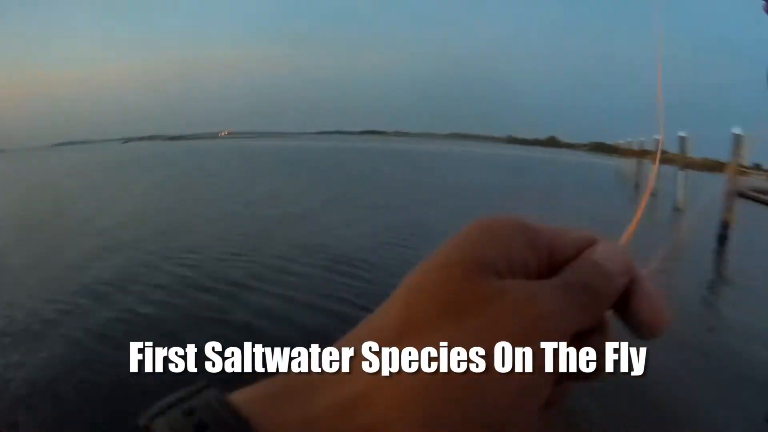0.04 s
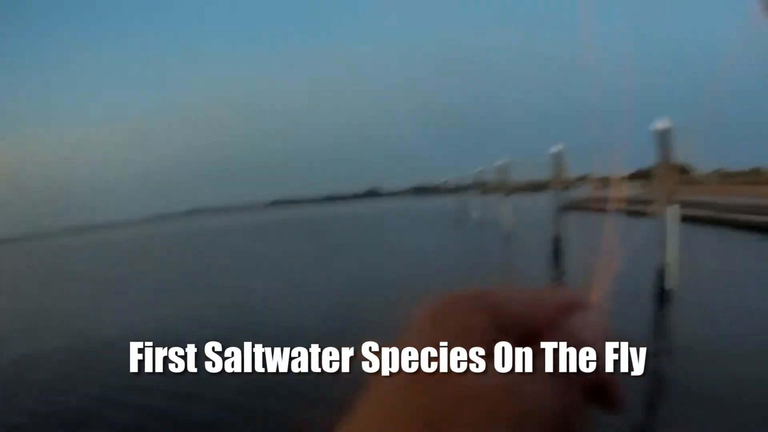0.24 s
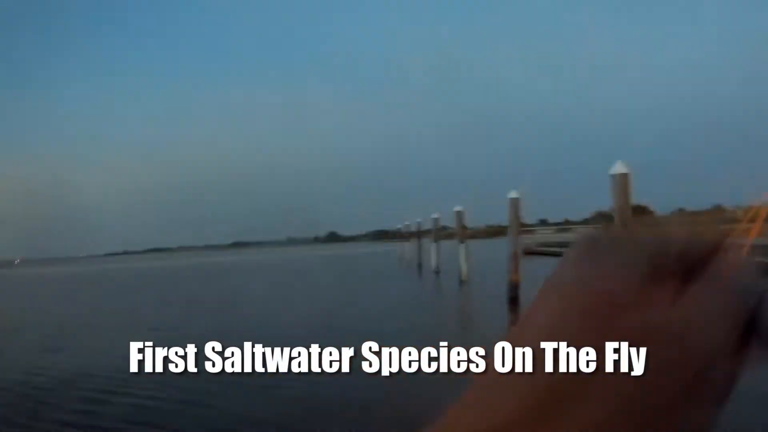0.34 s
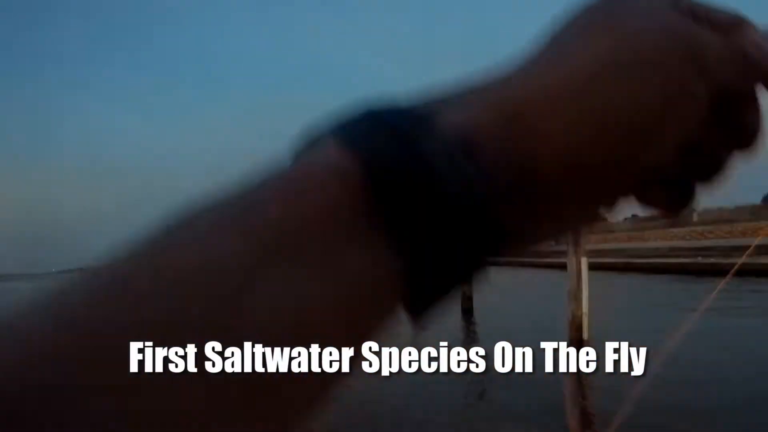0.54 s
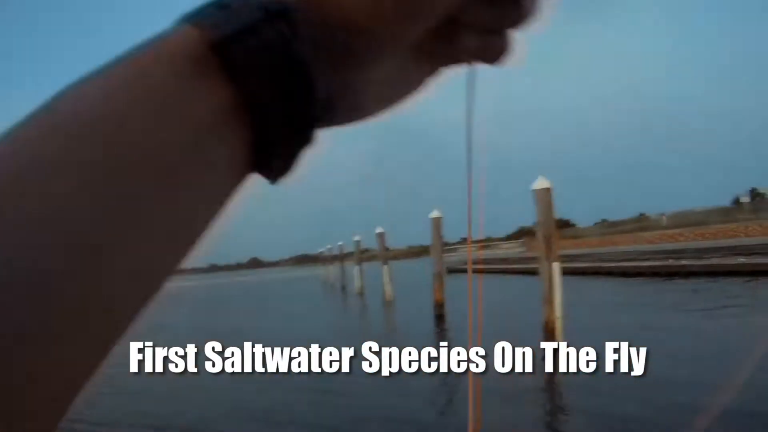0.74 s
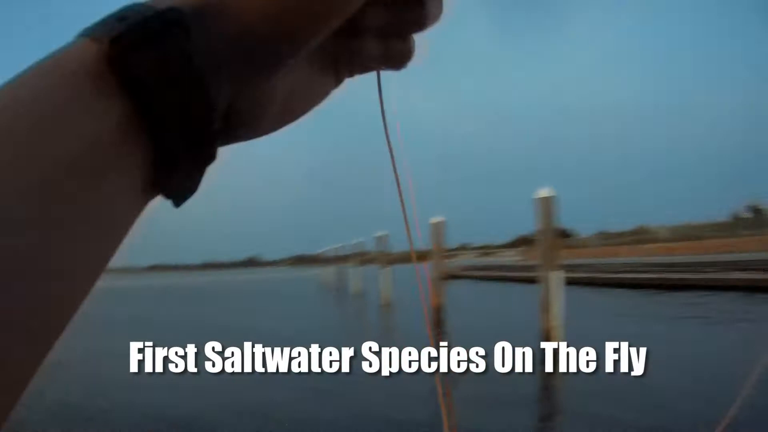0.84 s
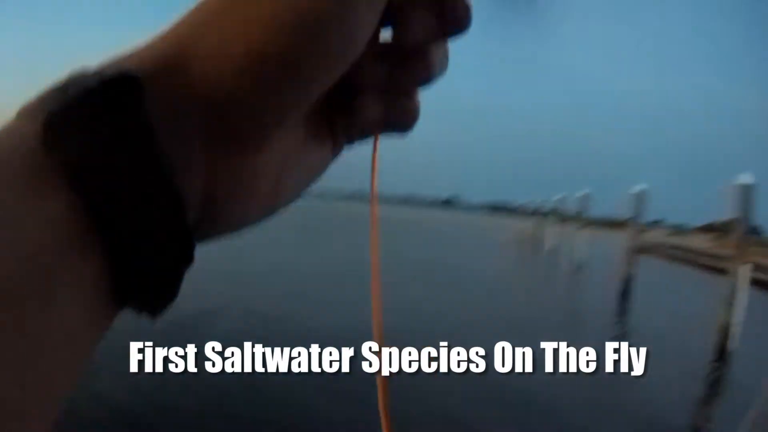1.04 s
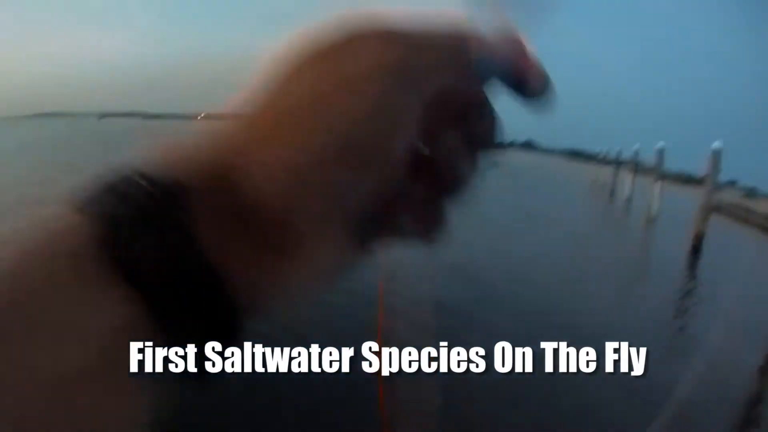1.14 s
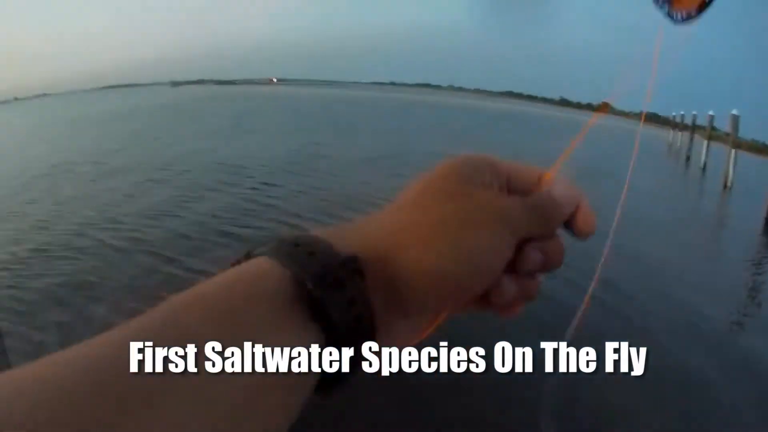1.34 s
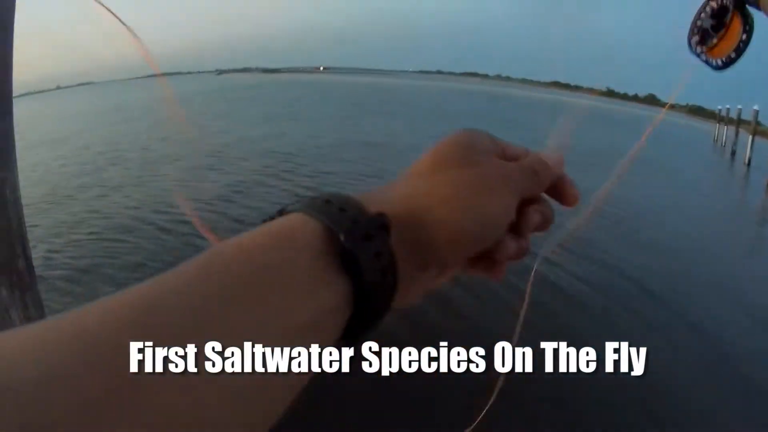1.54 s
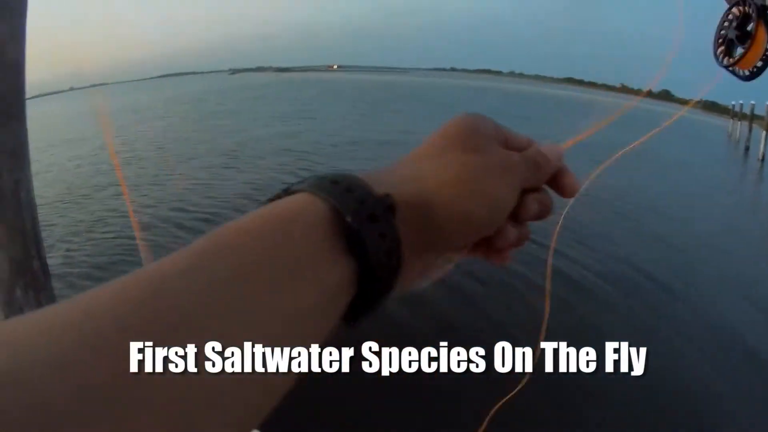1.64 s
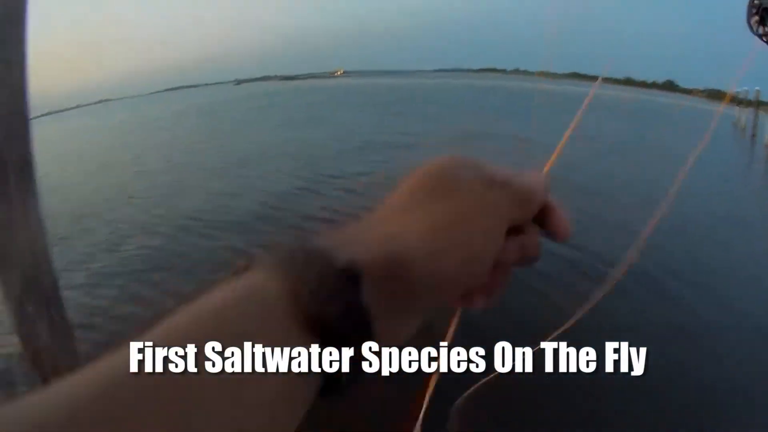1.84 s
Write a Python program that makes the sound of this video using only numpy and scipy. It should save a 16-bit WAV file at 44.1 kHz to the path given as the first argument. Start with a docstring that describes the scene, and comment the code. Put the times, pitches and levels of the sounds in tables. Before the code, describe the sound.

A fishing line snaps sharply against a rod, with soft rubbing and faint water wash.

```python
"""A faint wash of calm water and hiss, then a fly line ticking and snapping against the rod.
We are at the water's edge in open air, the line drawn through the fingers close to a body-worn camera.
Each strike cracks and rings briefly; between strikes, line and sleeve rub softly and the line squeaks.
The moving arm bumps the camera and stirs a low rumble. A thin electronic whine lies under it all."""
import sys
import numpy as np
from scipy import signal
from scipy.fft import rfft, irfft
from scipy.io import wavfile

SR = 44100
rng = np.random.default_rng(int(sys.argv[2]) if len(sys.argv) > 2 else 0)


def wav_record(signal):
    """Record a signal, one row per channel, as 16-bit PCM in the file named by sys.argv[1]."""
    frames = np.transpose(np.atleast_2d(signal))
    bounded = np.clip(frames, -1, 1)
    # unit amplitude maps onto the largest positive 16-bit level
    quanta = np.round(bounded * 32767).astype(np.int16)
    wavfile.write(sys.argv[1], SR, quanta)


N = 83790
TOP_HZ = 15850  # upper limit of the camera's sound


def undb(db):
    """Decibels to gain."""
    return 10 ** (np.asarray(db) / 20)


def unit(x):
    """Scale to rms 1."""
    return x / np.sqrt(np.mean(x ** 2))


def curve(rows):
    """Gain over time through points of seconds and dB."""
    return undb(np.interp(np.arange(N) / SR, *np.array(rows).T))


def colour(x, rows):
    """Filter through points of Hz and dB, then scale to rms 1."""
    hz, db = np.array(rows).T
    f = np.maximum(np.fft.rfftfreq(N, 1 / SR), 1)
    gain = undb(np.interp(np.log(f), np.log(hz), db))
    return unit(irfft(rfft(x) * gain, N))


def band(hz, width_hz):
    """Noise in one resonance, at rms 1; centred on 0 Hz it is a random wander."""
    f = np.fft.rfftfreq(N, 1 / SR)
    return unit(irfft(rfft(rng.standard_normal(N)) / (1 + ((f - hz) / (width_hz / 2)) ** 2), N))


def fade(t, t60):
    """Exponential decay, 60 dB down after t60 seconds."""
    return np.exp(-np.log(1000) * t / t60)


def knocks(rows, attack_cycles=0.47):
    """Soft contacts, each answered by one damped mode that swells within a cycle."""
    out = np.zeros(N)
    for start, hz, db, t60 in rows:
        t = np.maximum(np.arange(N) / SR - start, 0)
        attack = 1 - np.exp(-(t * hz / attack_cycles) ** 2)
        out += undb(db) * np.sin(2 * np.pi * hz * t) * fade(t, t60) * attack
    return out


def water_and_whine():
    """Faint water wash and hiss with a thin electronic whine; all swell and sink together."""
    # Each row: time in seconds, level in dB.
    levels = [(0, -64.5), (.2, -66), (.32, -54), (.5, -58), (.62, -60), (.8, -63.5), (1.02, -64),
              (1.09, -59), (1.3, -60), (1.46, -61), (1.65, -65.5), (1.9, -64.5)]
    # The wash and hiss. Each row: frequency in Hz, relative level in dB.
    spectrum = [(30, 8), (140, 15), (250, 9.5), (500, 5.5), (1300, 3), (2200, 1.5), (5000, -1), (9000, 0),
                (12000, -2), (14700, 0), (16000, 0)]
    # Narrow noise bands of the whine. Each row: centre in Hz, width in Hz, level in dB against the wash.
    whine_bands = [(6810, 47, -18), (10480, 64, -19)]
    waver_db, tone_db, tone_hz = 1.02, -5.5, 13714
    t = np.arange(N) / SR
    wash = undb(waver_db * band(0, width_hz=20)) * colour(rng.standard_normal(N), spectrum)
    tone = undb(tone_db) * np.sqrt(2) * np.sin(2 * np.pi * tone_hz * t)
    whine = tone + sum(undb(db) * band(hz, width) for hz, width, db in whine_bands)
    return curve(levels) * (wash + whine)


def arm_rumble():
    """Air and arm movement make slow pressure swings right on the microphone."""
    # Each row: time in seconds, level in dB.
    levels = [(0, -60), (.18, -60), (.25, -45), (.34, -39), (.42, -52.5), (.52, -46), (.6, -55),
              (.8, -53.5), (.94, -60.5), (1.02, -45.5), (1.09, -63), (1.14, -45), (1.28, -48), (1.4, -49),
              (1.48, -62), (1.6, -53.5), (1.68, -70), (1.9, -57.5)]
    # Each row: frequency in Hz, relative level in dB.
    spectrum = [(8, -2), (20, 4.5), (35, -10), (55, -11.5), (100, -23), (145, -17), (200, -36.5),
                (400, -42), (1000, -76)]
    return curve(levels) * colour(rng.standard_normal(N), spectrum)


def camera_bumps():
    """The arm nudges the camera, which answers with low, dull thuds."""
    # Each row: start in seconds, pitch in Hz, level in dB, 60 dB decay time in seconds.
    bumps = [(.275, 108.6, -25.5, 0.037), (.279, 300, -42.5, 0.053), (.359, 122.4, -19, 0.036),
             (.381, 142, -31, 0.047), (.456, 80.5, -26, 0.034), (.486, 186, -19, 0.02),
             (.498, 143.6, -39, 0.11), (.68, 85.5, -39, 0.045), (1.0335, 143, -26, 0.13),
             (1.311, 330, -54.5, 0.087), (1.58, 85.4, -44, 0.064)]
    return knocks(bumps)


def rubbing():
    """Line and sleeve rub close by: fine friction with catches and surges, swelling with each pull."""
    # Each row: time in seconds, level in dB.
    levels = [(0, -88), (.16, -78), (.27, -62.5), (.33, -55.5), (.38, -53.5), (.44, -55.5), (.47, -56.5),
              (.5, -53.5), (.56, -68), (.66, -67), (.78, -79), (1.03, -75.5), (1.09, -61.5), (1.14, -73),
              (1.23, -60.5), (1.33, -70.5), (1.44, -73), (1.68, -73.5), (1.9, -85.5)]
    # Each row: frequency in Hz, relative level in dB.
    spectrum = [(200, -13.5), (500, -6), (1200, -11), (1600, 5), (2000, -10), (2800, -5.5), (3400, -15.5),
                (7000, -17), (11000, -17), (16000, -51)]
    catches_per_s, catch_gain, surge_db = 900, 0.57, 2.13
    catches = (rng.random(N) < catches_per_s / SR) * rng.standard_normal(N)
    surges = undb(surge_db * band(0, width_hz=90))
    friction = rng.standard_normal(N) + catch_gain * unit(catches)
    return curve(levels) * surges * colour(friction, spectrum)


def line_squeaks():
    """Tiny high squeaks as the line slips, each a brief swell of narrow noise."""
    # Each row: peak time in seconds, pitch in Hz, level in dB, half-length in seconds.
    squeaks = [(.17, 4170, -63, 0.0025), (0.252, 3720, -59, 0.0045), (0.383, 3940, -60, 0.004),
               (.468, 3740, -54, 0.0036), (.469, 7100, -55.5, 0.0031), (0.58, 9550, -66, 0.031),
               (0.612, 9450, -62.5, 0.013), (0.64, 11800, -63.5, 0.015), (0.654, 7200, -67.5, 0.0073),
               (0.7, 9260, -66, 0.021), (1.368, 8300, -68, 0.018), (1.377, 6100, -73, 0.073),
               (1.4656, 6250, -56, 0.0017), (1.4625, 7140, -55, 0.0018), (1.501, 6760, -64.5, .009)]
    out, t = np.zeros(N), np.arange(N) / SR
    for peak, hz, db, half_length in squeaks:
        swell = np.exp(-((t - peak) / half_length) ** 2)
        out += undb(db) * swell * band(hz, width_hz=.11 * hz)
    return out


def line_taps():
    """The line touches lightly, each tap a short pitched tick."""
    # Each row: start in seconds, pitch in Hz, level in dB, 60 dB decay time in seconds.
    taps = [(.2265, 1350, -43, 0.024), (.3165, 1340, -30, 0.016), (.349, 1470, -43, 0.038),
            (.36, 960, -47, .016), (.4872, 1844, -37.5, 0.022), (.4878, 1060, -38, 0.016),
            (.4915, 1580, -34.5, 0.016), (.9665, 1540, -40, 0.017), (.9695, 1670, -45, .016),
            (1.313, 1783, -49, 0.033)]
    return knocks(taps)


def line_snaps():
    """Close up, the line hits the rod and rebounds: a crack and a short ring, duller on soft strikes."""
    # Each row: start in seconds, level in dB, treble corner in Hz.
    strikes = [(0.177, -21.5, 1000), (0.2264, -16.5, 3050), (0.2487, -29.5, 3800), (.30265, 0, 19000),
               (.30838, -4, 11500), (.31165, -12, 8500), (0.3152, -17, 5000), (0.4674, -28, 6000),
               (.4875, -14, 900), (1.699, -36.5, 4000)]
    # The modes every strike rings. Each row: pitch in Hz, level in dB, 60 dB decay time in seconds.
    modes = [(1315, -43, 0.028), (1620, -20.5, 0.013), (1860, -39.5, 0.037), (2580, -30.5, 0.009),
             (3100, -37.5, 0.018), (3920, -18.5, 0.0075), (4540, -23, 0.0027), (5440, -30, .0074),
             (6150, -24, 0.0062), (6700, -25, 0.0086), (7690, -24.5, 0.0036), (8790, -29.5, 0.0067),
             (10940, -22, 0.0041), (14900, -19, 0.0017)]
    crack_db, bass_lag_s, low_cut_hz = -33.5, 0.00069, 1180
    out, t = np.zeros(N), np.arange(SR // 10) / SR
    ring = sum(undb(db) * np.sin(2 * np.pi * hz * t) * fade(t, t60) for hz, db, t60 in modes)
    for start, db, corner_hz in strikes:
        crack = undb(crack_db) * rng.standard_normal(len(t)) * fade(t, t60=0.0077)
        soften = signal.butter(1, corner_hz, fs=SR)
        strike = undb(db) * signal.lfilter(*soften, ring + crack)
        i = int(start * SR)
        out[i:i + len(t)] += strike[:N - i]
    f = np.fft.rfftfreq(N, 1 / SR)
    lag = np.exp(-2j * np.pi * bass_lag_s * f * (1 - f / (2 * TOP_HZ)))  # lows arrive a moment later
    low_cut = 1j * f / (1j * f + low_cut_hz)
    return irfft(rfft(out) * lag * low_cut, N)


def scene():
    """All sources at one body-worn microphone, in open air beside the water."""
    contacts = line_snaps() + line_taps() + camera_bumps()
    sliding = rubbing() + line_squeaks()
    return (contacts + sliding + arm_rumble() + water_and_whine())[None]


def record(dry):
    """The camera cuts the top treble steeply."""
    return signal.sosfilt(signal.ellip(10, .2, 80, TOP_HZ, fs=SR, output="sos"), dry)


dry = scene()
out = record(dry)
wav_record(out)
```